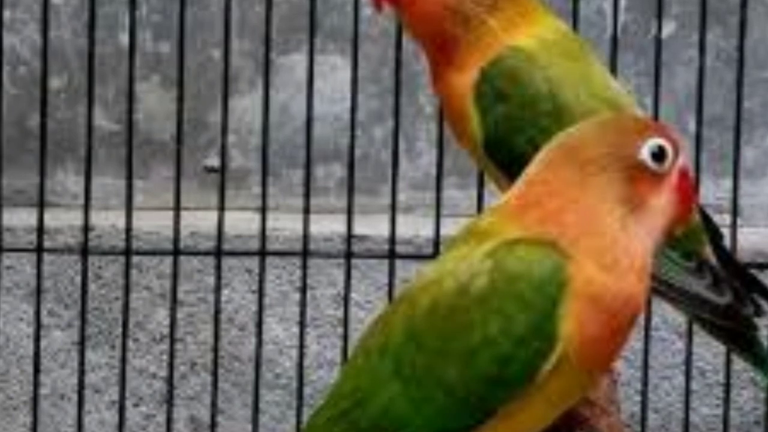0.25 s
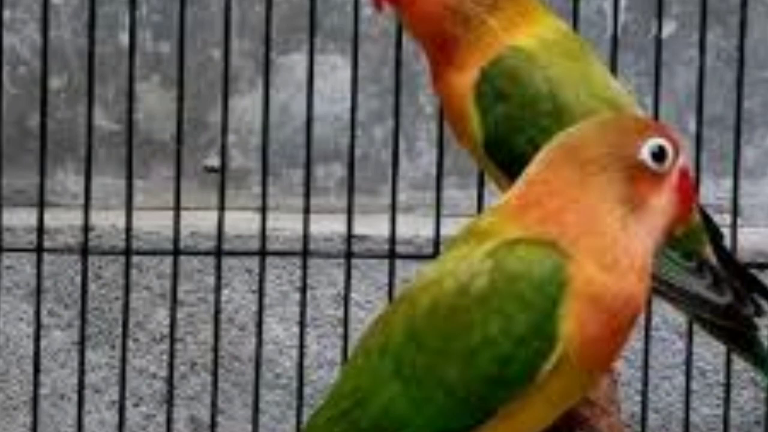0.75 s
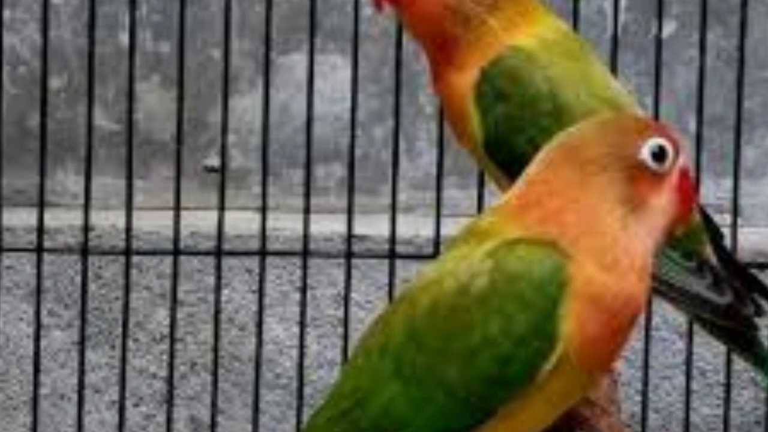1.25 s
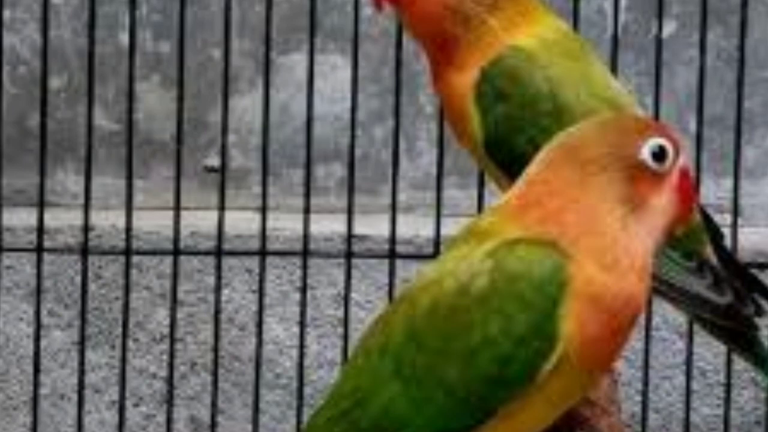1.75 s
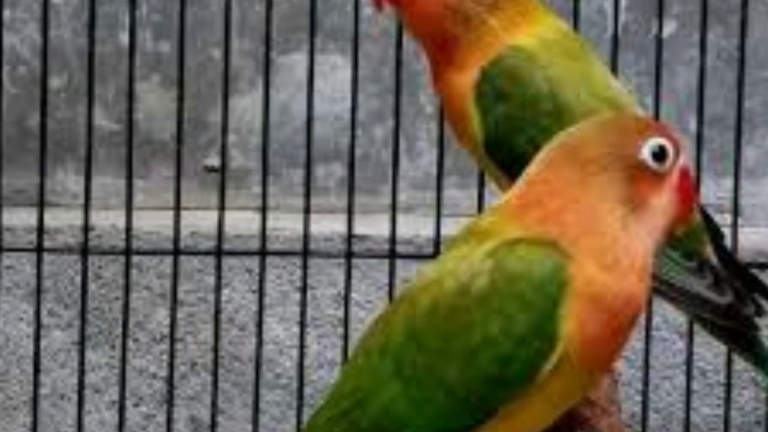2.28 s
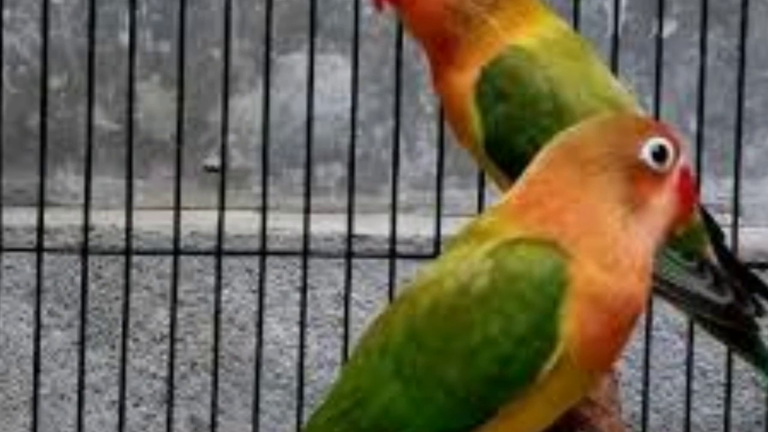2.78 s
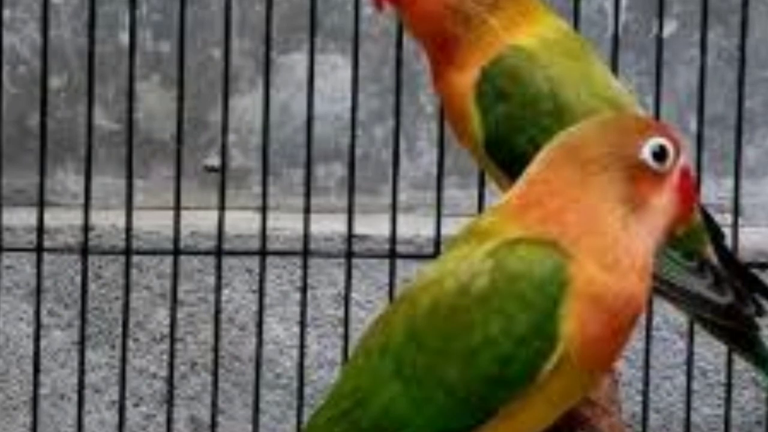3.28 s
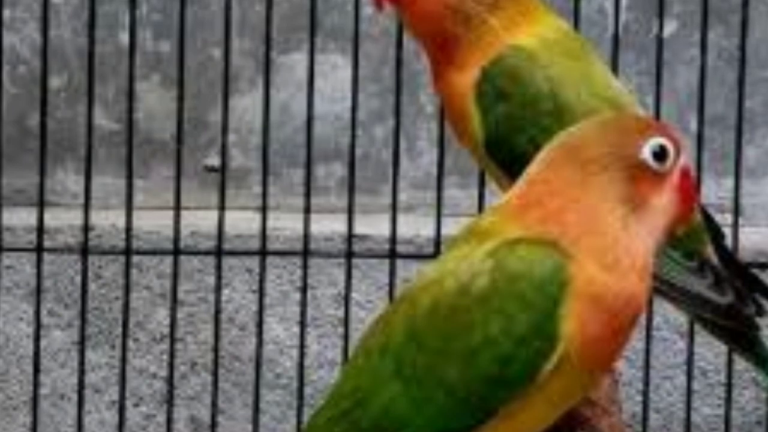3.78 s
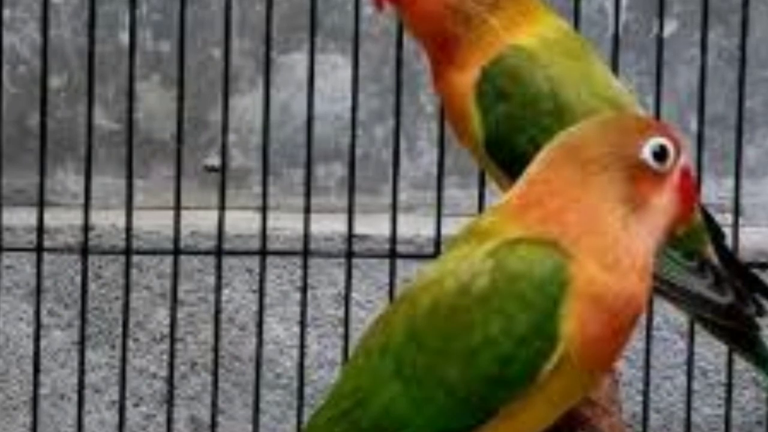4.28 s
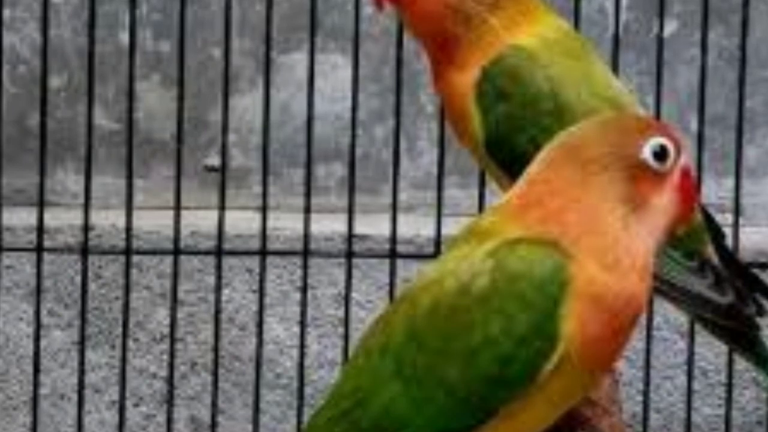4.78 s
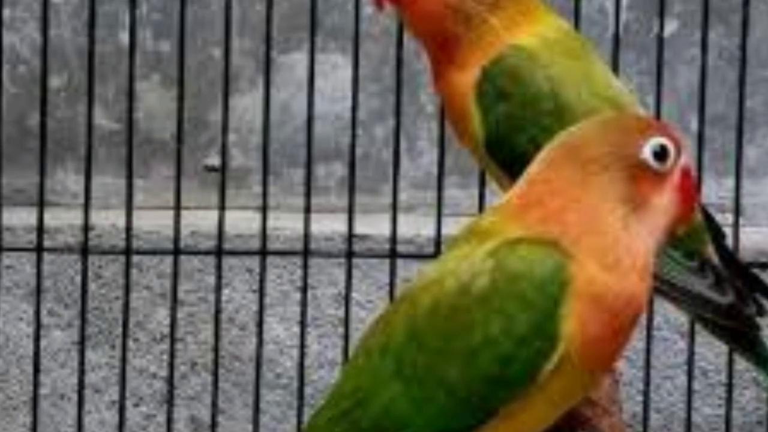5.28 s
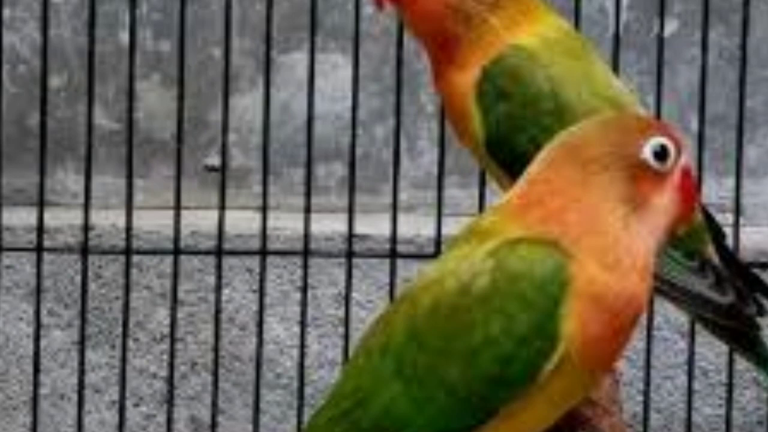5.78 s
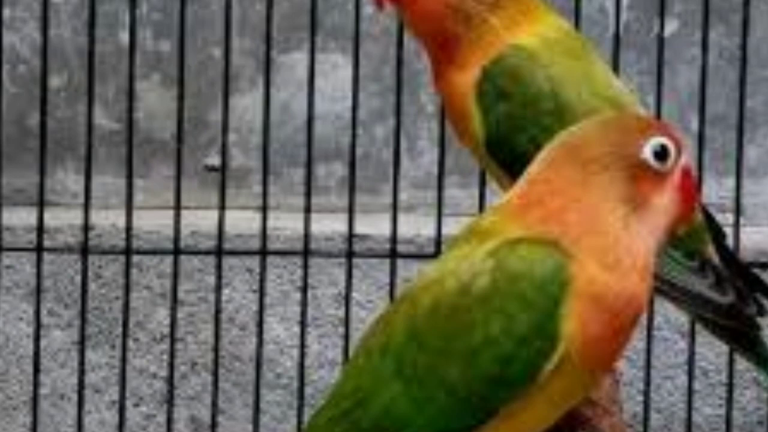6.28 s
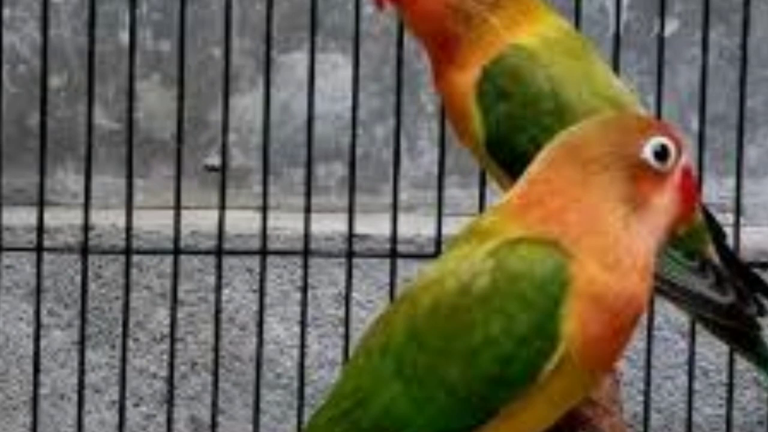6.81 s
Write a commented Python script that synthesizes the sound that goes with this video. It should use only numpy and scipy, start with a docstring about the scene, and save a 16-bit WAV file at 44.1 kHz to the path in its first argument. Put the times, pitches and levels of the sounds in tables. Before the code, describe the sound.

A caged lovebird chatters nonstop in rapid, sharp, high reedy chirps close by, while a second bird whistles faintly behind in a small hard room.

```python
"""A caged lovebird close to the microphone chatters about eight times a second; a second bird whistles further off.
Each chirp is a harmonic stack that holds a reedy note, then breaks into a fast, settling frequency modulation.
The second bird and faint distant coos are near-sine glides. Decaying noise gives the short room reverberation;
narrow low noise bands make the traffic rumble outside, and shaped noise the faint air of the room."""
import sys
import numpy as np
from scipy import signal
from scipy.fft import rfft, irfft, next_fast_len
from scipy.io import wavfile
from scipy.ndimage import uniform_filter1d

SR = 44100
rng = np.random.default_rng(int(sys.argv[2]) if len(sys.argv) > 2 else 0)


def persist_wave(psi):
    """Save psi, clipped to +-1, as 16-bit WAV."""
    counts = np.round(np.clip(psi, -1, 1) * 32767).astype(np.int16)
    wavfile.write(sys.argv[1], SR, np.atleast_2d(counts).T)


N = 310905


def undb(db):
    """Logarithmic level: decibels become an amplitude gain."""
    return 10 ** (np.asarray(db) / 20)


def colour(x, gain):
    """Linear filtering: the spectrum of x is multiplied by gain(Hz)."""
    size = next_fast_len(len(x))
    hz = np.arange(size // 2 + 1) * SR / size + 0.0011  # the offset keeps the logarithm finite
    return irfft(rfft(x, size) * gain(hz), size)[:len(x)]


def on_log(table):
    """Frequency response: points in Hz and dB are joined by lines on a log frequency axis."""
    hz, db = np.transpose(table)
    return lambda f: undb(np.interp(np.log(f), np.log(hz), db))


def wobble(hz, size):
    """Random modulation: two-pole low-passed noise of standard deviation 1, with its corner near hz."""
    keep = np.exp(-2 * np.pi * hz / SR)
    x = signal.lfilter([1], [1, -2 * keep, keep ** 2], rng.standard_normal(size))
    return x / x.std()


def add(out, s, x):
    """Superposition: x is summed into out from time s in seconds."""
    i = max(int(s * SR), 0)
    out[i:i + len(x)] += x[:len(out) - i]


def haste(held_ms):
    """Articulation: 0 for a chirp that holds its note 3 ms or more, rising to 1 at 2 ms or less."""
    return np.clip(3 - held_ms, 0, 1)


BUFFER_LEAD = 1323  # samples, 30 ms: each chirp's buffer starts early to make room for the beak click
# The near bird's chirps. Each row: start in seconds, length in ms, held note in ms, relative level in dB.
CHIRPS = [(0.0, 26.7, 4.5, -14.5), (0.1209, 28.7, 8.3, -15.5), (0.2456, 27.8, 7.1, -14.5),
          (0.3675, 29, 6.3, -16.5), (0.4919, 30.5, 4.9, -15.5), (0.615, 29.3, 3.7, -15.5),
          (0.744, 35.2, 5.3, -16.5), (0.8731, 31, 7, -15.5), (0.9911, 33, 7.6, -14),
          (1.117, 31, 7.2, -14.5), (1.243, 31.8, 9.6, -16.5), (1.371, 40.7, 12, -18.5),
          (1.502, 39, 11.3, -17), (1.618, 37.4, 11.2, -15.5), (1.7422, 38.3, 13.4, -16),
          (1.87, 34.5, 6.9, -15), (1.99, 34.6, 5.7, -15.5), (2.1152, 35.7, 9.9, -16.5),
          (2.234, 32, 8.3, -14.5), (2.3451, 33, 7.4, -17), (2.4636, 28, 3.5, -14.5),
          (2.5755, 30.3, 4.9, -14), (2.6965, 31.2, 4.8, -13.5), (2.818, 30, 8.8, -15.5),
          (2.94, 31.4, 7.3, -17), (3.062, 31.5, 6.8, -14.5), (3.1807, 28.6, 1.23, -13.5),
          (3.3006, 28.6, 2.4, -16), (3.4295, 29, 2.1, -16), (3.5606, 26.4, 0.53, -18),
          (3.6899, 26.6, 0.79, -15.5), (3.8167, 24.6, 0.83, -15.5), (3.931, 30, 1.05, -16.5),
          (4.0501, 28, 1.94, -17), (4.176, 28.5, 1.83, -15), (4.306, 22, 0.39, -12),
          (4.4298, 25.3, 0.42, -13.5), (4.548, 25, 0.27, -13.5), (4.6698, 23.3, 0.75, -14),
          (4.785, 32.2, 0.53, -13), (4.9114, 30.8, 9.9, -14.5), (5.0342, 32, 5.4, -14.5),
          (5.1595, 31, 11.7, -14), (5.3, 24.3, 4.2, -13), (5.4472, 28.3, 3.2, -13.5),
          (5.5475, 27.8, 3.2, -13), (5.6443, 29.5, 6.1, -11.5), (5.7933, 32.6, 3.76, -13),
          (5.9319, 34.8, 3.5, -13), (6.0521, 35.8, 5.1, -14.5), (6.1626, 31, 4.4, -12.5),
          (6.2743, 33.3, 7.4, -13.5), (6.3876, 30, 7.4, -11.5), (6.5005, 35.3, 6.3, -14),
          (6.6153, 33, 6, -13), (6.732, 39.2, 6.3, -12.5), (6.849, 35, 3.34, -13), (6.9606, 35, 5.7, -12.5)]
# The drift of the voice through the run. Each row: time in seconds, held pitch in Hz, warble centre in Hz,
# swing as a share of the centre, warble rate in Hz, level added to harmonics 1 and 5 in dB.
VOICE = [(0, 1982, 2830, 0.21, 205, -4.5), (1.502, 1991, 2619, 0.19, 222, 2.5),
         (2.049, 1954, 2617, 0.23, 189.4, 1), (3.1, 1955, 2690, 0.35, 200.7, 1.5),
         (3.15, 2222, 2820, 0.31, 204.4, 3), (3.62, 2250, 2944, .3, 222, 0),
         (3.67, 2250, 3320, 0.37, 235.3, 1.6), (4.82, 2247, 2950, 0.27, 207, 0.5),
         (4.88, 1929, 2755, 0.31, 204.3, 6), (5.48, 1920, 2667, 0.25, 228.4, -3.5),
         (5.52, 2100, 2785, 0.15, 218, -2.5), (7.05, 2110, 2760, 0.15, 221, -0.5)]
HELD_DB, HASTY_HELD_DB = -1.16, 3.5  # held note against the warble; added when the note is cut short
CENTRE_SCATTER, RATE_SCATTER, HELD_SCATTER_DB = .02, .05, 1.5  # standard deviations from chirp to chirp


def chatter():
    """Repeated phonation: a run of chirps whose pitch, rate and balance scatter about a drifting voice."""
    out = np.zeros(N + BUFFER_LEAD)
    at, *voice = np.transpose(VOICE)
    chances = rng.standard_normal((len(CHIRPS), 3))
    for (s, ms, held_ms, db), (held_chance, centre_chance, rate_chance) in zip(CHIRPS, chances):
        held_hz, centre_hz, swing, rate_hz, boost_db = (np.interp(s, at, c) for c in voice)
        held_db = db + HELD_DB + HASTY_HELD_DB * haste(held_ms) + HELD_SCATTER_DB * held_chance
        centre_hz = centre_hz * (1 + CENTRE_SCATTER * centre_chance)
        rate_hz = rate_hz * (1 + RATE_SCATTER * rate_chance)
        add(out, s, chirp(s, ms, held_ms, held_db, db, held_hz, centre_hz, swing, rate_hz, boost_db))
    return out[BUFFER_LEAD:]


# The harmonics of the syrinx, from the first up. Each row: level in the held note in dB, in the warble in dB.
OVERTONES_DB = [(-5, 2), (0, 1.36), (-4, 2), (2.5, -11.5), (-8, -9), (-31, -7)]
SETTLE_TURNS = 6.5  # swings until the warble has shrunk to about a third
DULLING_DB = -1  # extra fade per harmonic over one chirp length


def chirp(s, ms, held_ms, held_db, warble_db, held_hz, centre_hz, swing, rate_hz, boost_db):
    """Frequency modulation of a syrinx: a steady harmonic stack, then a pitch that swings widely and settles."""
    t = np.arange(4096) / SR - BUFFER_LEAD / SR
    seconds = ms / 1000
    turns = np.maximum(t - held_ms / 1000, 0) * rate_hz
    jump = np.minimum(2 * turns, 1)  # from held note (0) to warble (1) in half a swing
    spent = np.maximum(1000 * t - held_ms, 0) / ms
    hasty = haste(held_ms)

    # chirps that skip the held note climb as they go, and are harsher
    centre = centre_hz * (1 + 0.0765 * hasty * (2 * t / seconds - 1))
    warble = centre * (1 - swing * np.exp(-turns / SETTLE_TURNS) * np.cos(2 * np.pi * turns))
    hz = held_hz + (warble - held_hz) * jump * (2 - jump)
    # the membranes run unevenly, more so in the warble
    unevenness = .005 + (.018 + .03 * hasty) * jump
    hz = hz * (1 + unevenness * wobble(600, size=len(t)))
    phase = 2 * np.pi * np.cumsum(hz) / SR

    tone = np.zeros(len(t))
    for k, (in_held, in_warble) in enumerate(OVERTONES_DB, 1):
        level_db = in_held + (in_warble - in_held) * jump
        level_db = level_db + DULLING_DB * (k - 1) * spent + (k in (1, 5)) * boost_db
        level_db = level_db + 2.6 * wobble(320, size=len(t))
        tone += undb(level_db) * np.cos(k * phase + k * k)
    breath = undb(-15 + 4 * jump + 7 * hasty - 4 * spent) * rng.standard_normal(len(t))

    fade_db = (-6 - 5 * hasty) * spent
    # the air flow pinches at the top of each swing
    fade_db = fade_db - 3.5 * jump * np.sin(np.pi * turns) ** 4
    level_db = held_db + (warble_db - held_db) * jump + fade_db
    shape = np.clip(t / .001, 0, 1) * np.clip((seconds - t) / .005, 0, 1)  # 1 ms attack, 5 ms release
    return tone_colour((tone + breath) * shape * undb(level_db) + beak_click(s, t), s)


CLICK_FROM_S, CLICK_LEAD_MS, CLICK_DB = 5.7, 19, -32


def beak_click(s, t):
    """Impulsive excitation: a tiny noise burst as the beak snaps open before each late chirp."""
    grain = 2 * uniform_filter1d(rng.standard_normal(len(t)), size=4)
    snap = np.exp(-((1000 * t + CLICK_LEAD_MS) / 0.35) ** 2) * grain
    return (s > CLICK_FROM_S) * undb(CLICK_DB) * snap


# The resonances of the throat. Each row: frequency in Hz, gain in dB.
THROAT = [(1200, -41), (1750, -34), (2000, -14), (2300, -30.5), (2800, -11), (3500, -2.5), (4200, -3),
          (5300, 2), (6500, 3), (8000, -4.5), (10000, 6.5), (12000, 0.5), (13500, -11), (15000, -46)]
# How the treble and a band near 3.5 kHz change through the run. Each row: time in seconds, treble edge in Hz,
# change above that edge in dB, change around BAND_HZ in dB.
TONE_CHANGES = [(0, 8540, -35, -7), (3.1, 8040, -32, -23.5), (3.3, 8150, -40.5, -5.5),
                (4.85, 8240, -36.5, 0), (4.95, 8140, -26.5, -21), (5.4, 8130, -36, -29),
                (5.499, 8530, -22.5, 16.5), (7.05, 8500, -17.5, 12)]
BAND_HZ, BAND_WIDTH_HZ = 3543, 297


def tone_colour(x, s):
    """Source-filter principle: throat resonances, a treble step and one band at time s shape the voice."""
    at, *changes = np.transpose(TONE_CHANGES)
    edge_hz, treble_db, band_db = (np.interp(s, at, c) for c in changes)

    def gain(f):
        """Cascaded filters: the gains of a smooth treble step and one narrow band multiply the resonances."""
        step = treble_db / 2 * (1 + np.tanh((f - edge_hz) / 255.0))
        band = band_db * np.exp(-((f - BAND_HZ) / BAND_WIDTH_HZ) ** 2)
        return on_log(THROAT)(f) * undb(step + band)

    return colour(x, gain)


# The second bird's calls. Each row: start in seconds, name of the call, length in ms, relative level in dB.
WHISTLES = [(0.16, "fall", 160, -48), (0.455, "fall", 170, -47), (0.764, "fall", 185, -47),
            (0.77, "peep", 60, -42), (1.49, "rise", 240, -45), (1.835, "rise", 228, -44),
            (2.147, "rise", 228, -42), (2.484, "arch", 190, -47), (2.793, "arch", 225, -46),
            (3.11, "arch", 195, -43), (3.445, "arch", 235, -39.5), (3.75, "zip", 138, -43),
            (3.795, "arch", 135, -45), (3.925, "zip", 132, -43), (4.085, "zip", 114, -41.5),
            (4.24, "zip", 120, -41), (4.395, "zip", 122, -41), (4.555, "zip", 138, -43.5),
            (4.72, "zip", 127, -41), (4.892, "zip", 122, -43), (5.066, "zip", 68, -45),
            (5.18, "zip", 64, -44), (5.262, "zip", 70, -46), (5.375, "zip", 88, -45),
            (5.488, "zip", 95, -46), (5.58, "hold", 40, -43)]
# The shapes of those calls. Each name leads to: start in Hz, end in Hz, bend (above 0 moves fastest at first,
# below 0 fastest at last), swell from start to end in dB.
CALL_SHAPES = {"fall": (5300, 3100, -.3, -5), "rise": (3650, 5700, 2.2, 6), "arch": (2950, 3990, 3.6, 4),
               "zip": (3300, 6950, -1.1, 8), "chip": (6100, 4300, -.1, 0), "peep": (6300, 5900, .1, 0),
               "hold": (3900, 4000, .1, 0)}
# A trill of quick chips. Each entry: start in seconds.
TRILL = [3.266, 3.314, 3.362, 3.41, 3.468, 3.514, 3.615, 3.672]
CHIP_MS, CHIP_DB = 19, -43


def second_bird():
    """Stereotyped pitch contours: every whistle or chip follows one of a few call shapes."""
    calls = WHISTLES + [(s, "chip", CHIP_MS, CHIP_DB) for s in TRILL]
    glides = [(s, ms, *CALL_SHAPES[call], db) for s, call, ms, db in calls]
    return whistles(glides, rough=.011, flutter_db=4.5)


# Faint low coos from far away. Each row: start in seconds, length in ms, start in Hz, end in Hz,
# relative level in dB.
COOS = [(2.5, 176, 1404, 1304, -79), (2.72, 120, 1430, 1379, -69), (4.42, 167, 1487, 1580, -80),
        (5.74, 100, 792, 830, -87), (6.17, 146, 1684, 1680, -68)]


def distant_coos():
    """Slow pitch glides: almost straight, without a swell."""
    glides = [(*glide, .1, 0, db) for *glide, db in COOS]
    return whistles(glides, rough=0.033, flutter_db=3.0)


GLIDE_SHARE = .9  # a whistle reaches its end pitch this far in, then stays


def whistles(table, rough, flutter_db):
    """Whistled tone: a near-sine with a faint octave bends exponentially to its end pitch and flutters."""
    out = np.zeros(N)
    for s, ms, start_hz, end_hz, bend, swell_db, db in table:
        u = np.linspace(0, 1, int(ms * SR / 1000))
        travel = (1 - np.exp(-bend * np.minimum(u / GLIDE_SHARE, 1))) / (1 - np.exp(-bend))
        hz = start_hz + (end_hz - start_hz) * travel
        # fast glides waver most, held pitches run purer
        quick = np.clip(np.abs(np.gradient(hz)) * SR / 25000, .2, 1)
        waver = rough * quick * wobble(270.0, size=16384)[:len(u)]
        phase = 2 * np.pi * np.cumsum(hz * (1 + waver)) / SR
        flutter = flutter_db * np.sqrt(quick) * wobble(170.0, size=16384)[:len(u)]
        level = undb(db + swell_db * (u - .5) + flutter) * np.sqrt(2 * np.sin(np.pi * u))
        add(out, s, level * (np.sin(phase) + undb(-47) * np.sin(2 * phase)))
    return out


ROOM_T60_S, ROOM_DB, ROOM_GAP_MS = 0.32, -17.5, 1.7


def room(x):
    """Diffuse reverberation: dense reflections from hard walls, as decaying noise of unit energy after a gap."""
    t = np.arange(SR // 2) / SR
    onset = np.clip(1000 * t / ROOM_GAP_MS - 1, 0, 1)
    tail = rng.standard_normal(len(t)) * undb(-60 * t / ROOM_T60_S) * onset
    return signal.fftconvolve(x, tail / np.sqrt(np.sum(tail ** 2)))[:N]


# The drone bands. Each row: centre in Hz, width in Hz.
RUMBLE_HZ = [(62, 7), (92, 26), (145, 36)]
# The swell of the drones. Each row: time in seconds, then the relative level of each band in dB.
RUMBLE = [(0.0, -60, -75, -83), (0.108, -78.5, -73.5, -111), (1.4, -74, -75, -85), (1.5, -64, -75, -104),
          (1.71, -50, -67, -79), (3.21, -51.5, -57, -59.5), (4.76, -59, -45, -53), (5.5, -86, -56.5, -65.5),
          (5.649, -73, -65.5, -93), (6.71, -78, -77.5, -87.5), (7.05, -66, -57, -83)]


def traffic():
    """Narrow-band noise: engine drones through the walls, low bands that swell and throb as vehicles pass."""
    s, *levels = np.transpose(RUMBLE)
    out = 0
    for (hz, width_hz), db in zip(RUMBLE_HZ, levels):
        def gain(f):
            """Resonance: a peak with a weak skirt above it."""
            skirt = undb(-22) * (f > hz) * (hz / f) ** 2.2
            return np.exp(-((f - hz) / width_hz) ** 2) + skirt

        band = colour(rng.standard_normal(N), gain)
        swell_db = np.interp(np.arange(N) / SR, s, db)
        throb_db = 3 * wobble(4., size=N)
        out = out + band / band.std() * undb(swell_db + throb_db)
    return out


# The spectrum of the air. Each row: frequency in Hz, relative density in dB per Hz.
AIR = [(15, -20), (25, -15.5), (98, -5), (155, -6), (363, -16.5), (516, -31), (711, -51), (1150, -30),
       (1500, -58), (2530, -120)]
AIR_DB = -78  # RMS level


def air():
    """Stationary coloured noise: the steady faint sound of the room."""
    x = colour(rng.standard_normal(N), on_log(AIR))
    return x / x.std() * undb(AIR_DB)


def scene():
    """Superposition of direct and reverberant sound: near bird, far birds, their room, traffic and air."""
    near = chatter()
    far = second_bird()
    coos = distant_coos()
    # the far birds are heard more through the room
    wet = undb(ROOM_DB) * room(near + undb(16) * (far + coos))
    return (near + far + coos + wet + traffic() + air())[None]


TOP_HZ = 15200


def record(dry):
    """Quadratic distortion and band limiting: the capsule bends slightly, the recorder cuts the top."""
    bend = dry ** 2 - uniform_filter1d(dry ** 2, size=200)  # less its local mean
    cut = signal.ellip(8, .2, 60, TOP_HZ, fs=SR, output="sos")
    return signal.sosfilt(cut, dry + undb(-54.0) * bend)


dry = scene()
out = record(dry)
persist_wave(out)
```